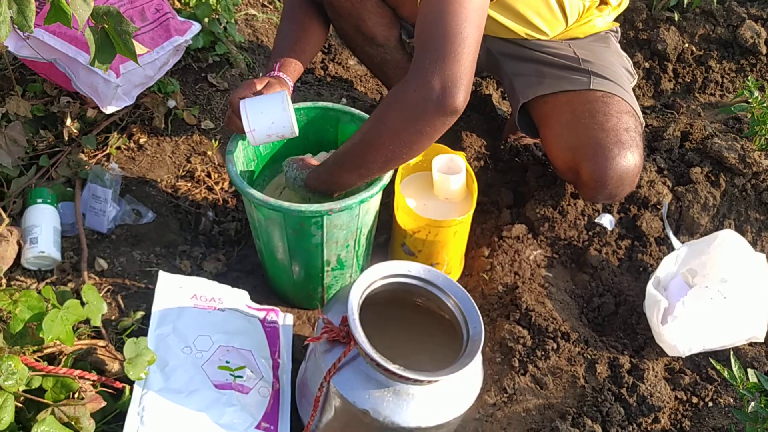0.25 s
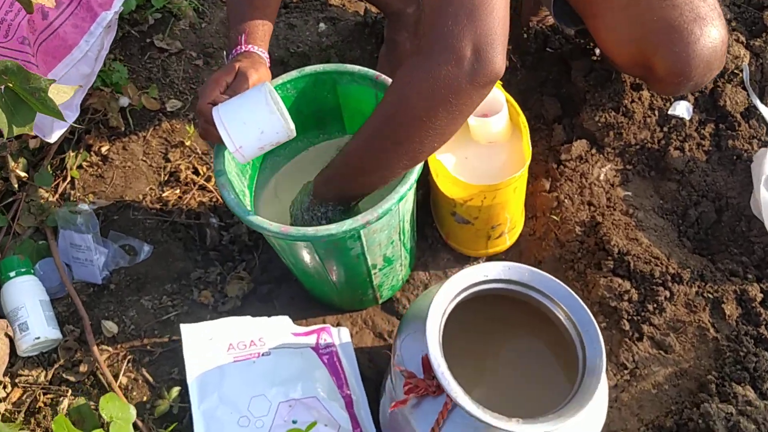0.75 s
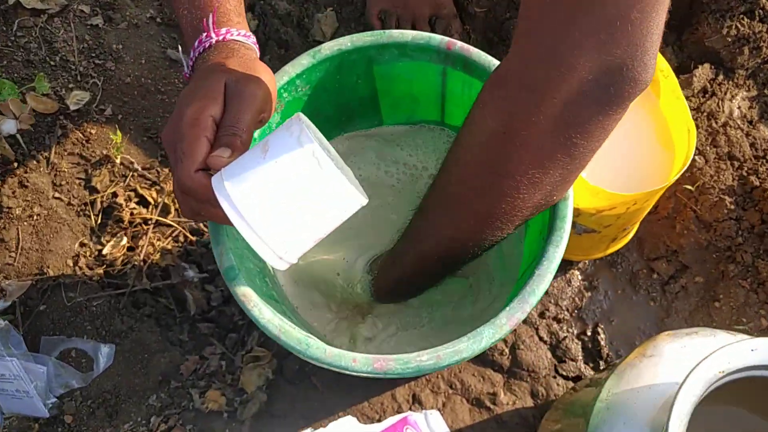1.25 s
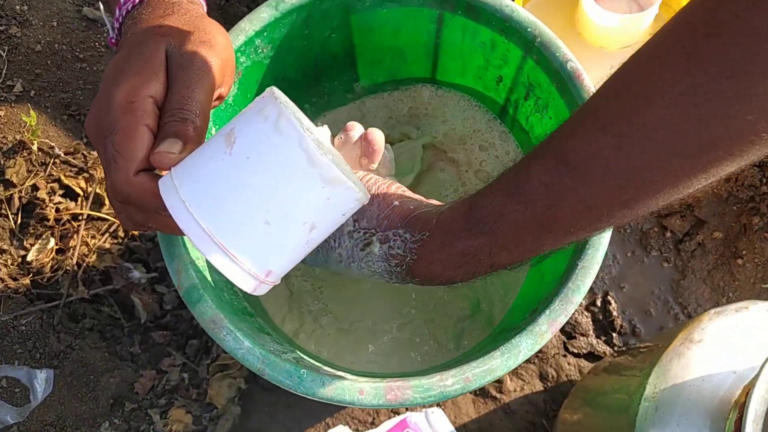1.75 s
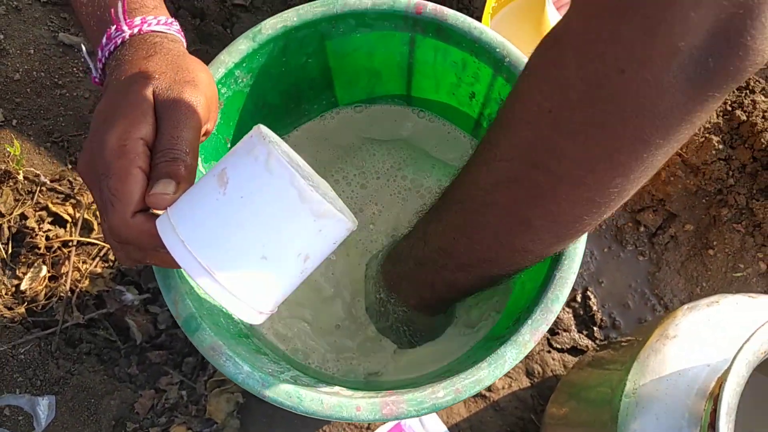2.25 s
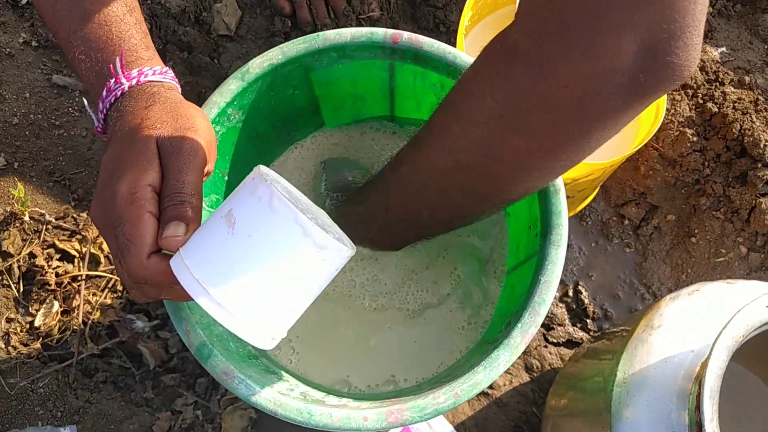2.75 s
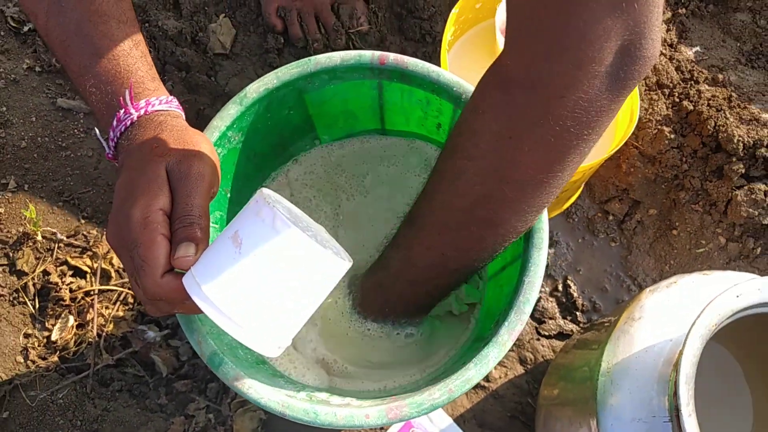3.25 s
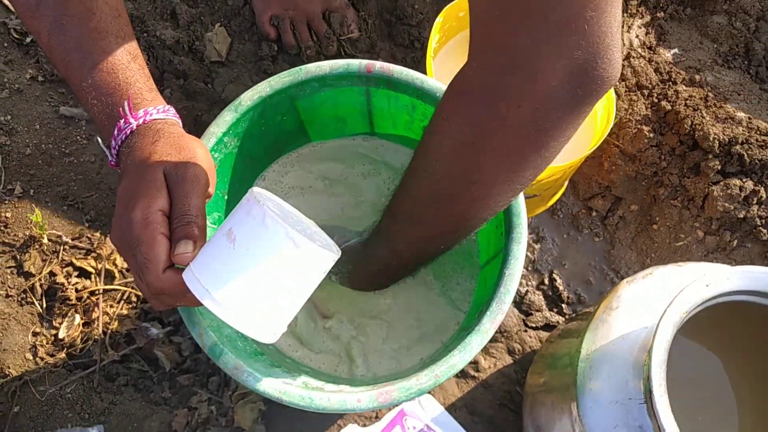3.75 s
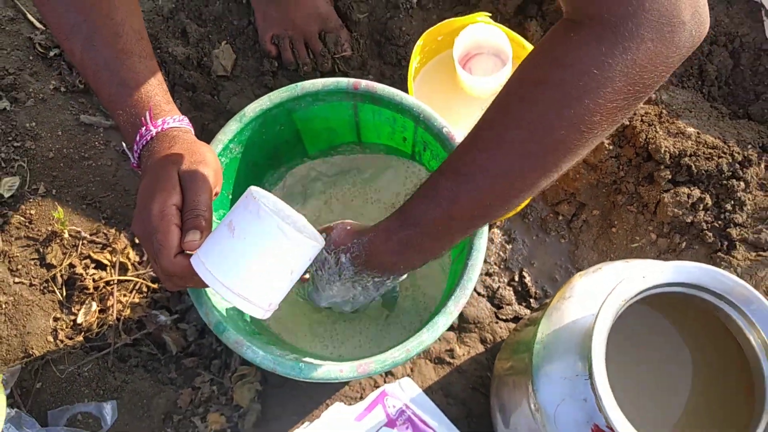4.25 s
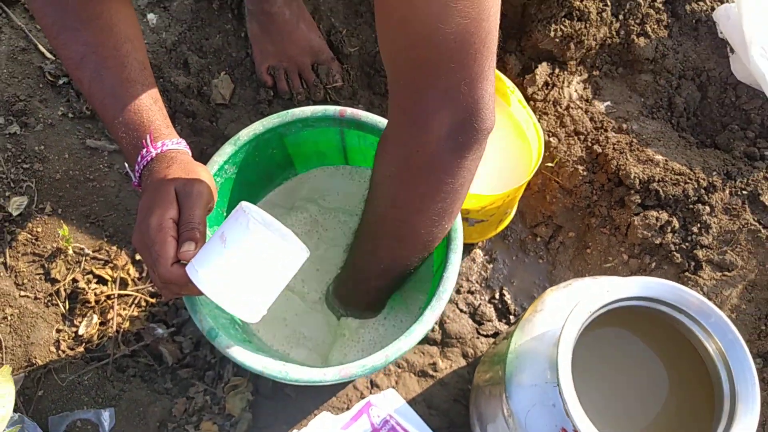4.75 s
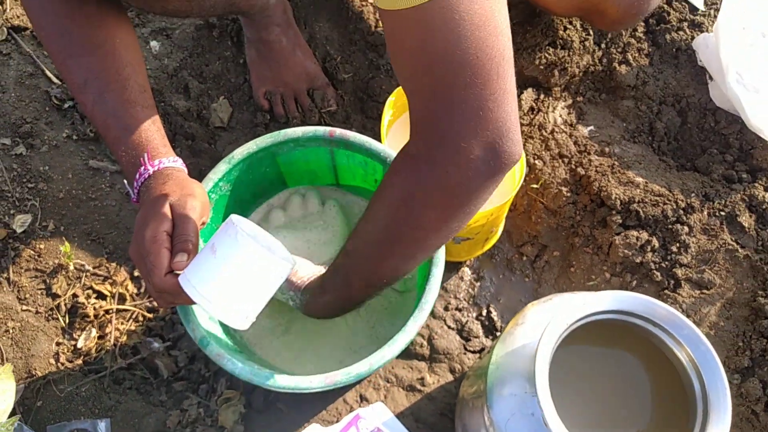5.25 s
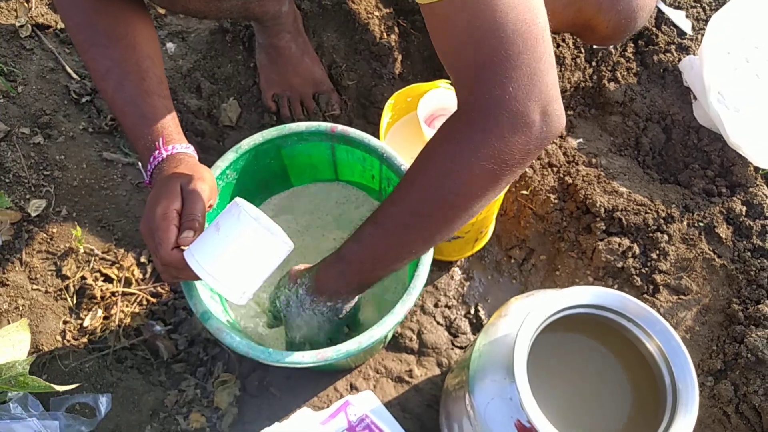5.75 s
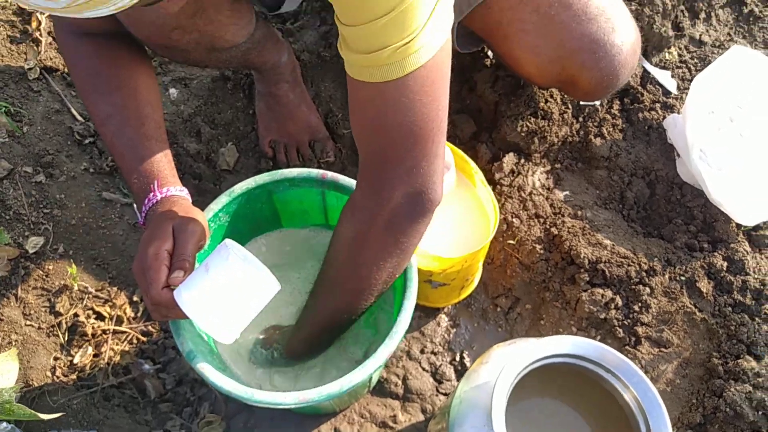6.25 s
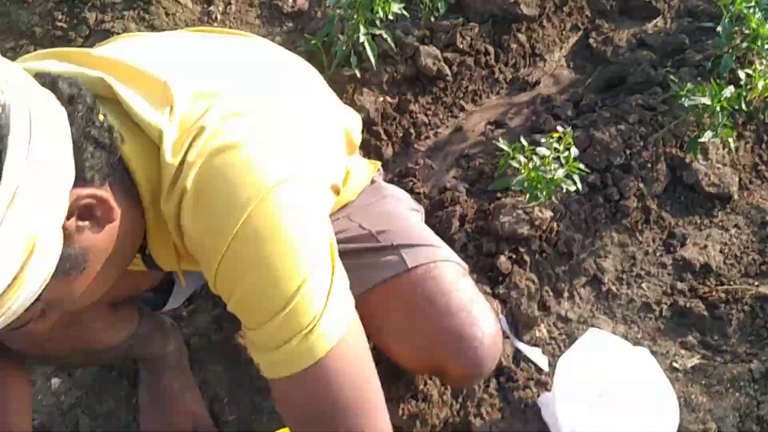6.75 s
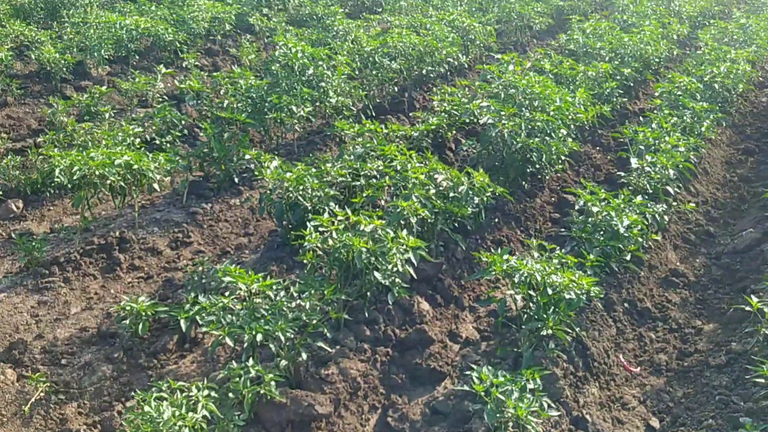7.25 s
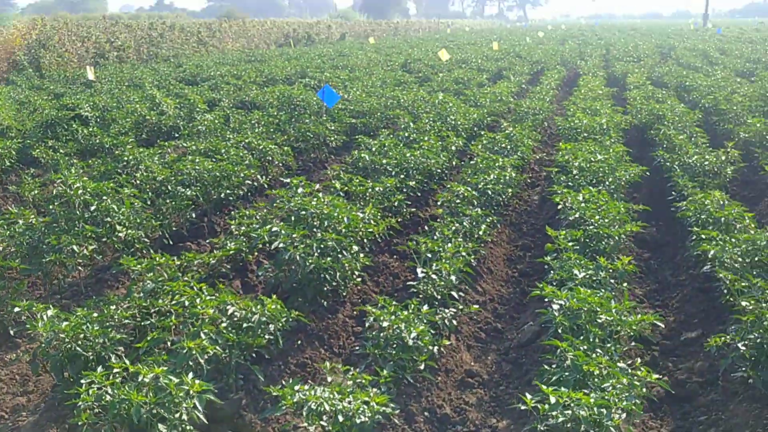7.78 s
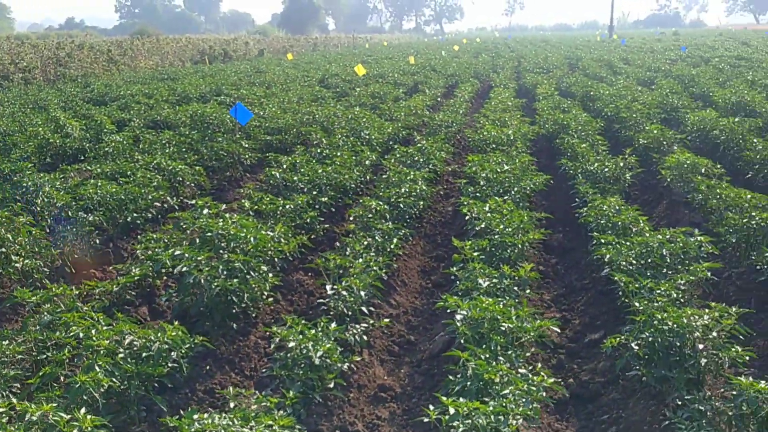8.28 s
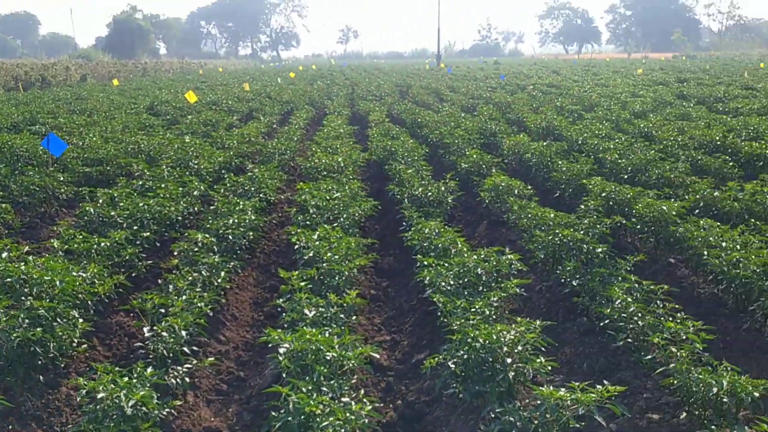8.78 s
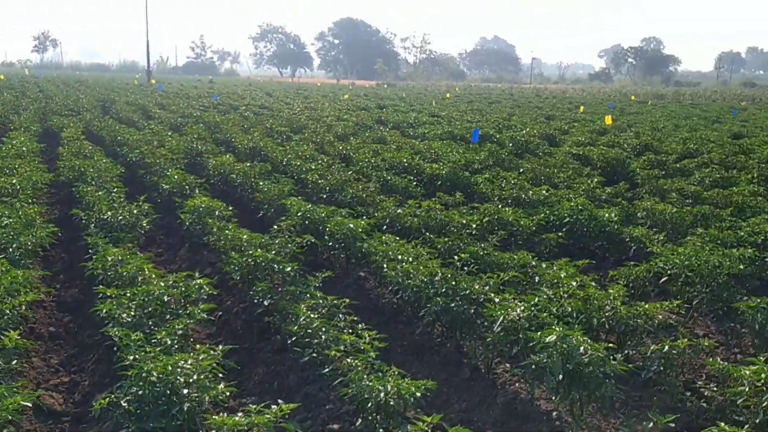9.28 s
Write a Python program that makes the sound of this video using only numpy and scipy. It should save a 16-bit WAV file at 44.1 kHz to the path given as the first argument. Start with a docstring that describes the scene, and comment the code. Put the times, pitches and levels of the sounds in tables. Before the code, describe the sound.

A quiet open field, heard in close, dry stereo with a faint steady hush. From 0 s a hand moves foamy water in a plastic bucket: a sharp tick far to the right and small slaps at 0.25 s, then lighter sloshes around 0.5 and 1 s. From 1.4 to 2.3 s the stirring is strongest, with hollow mid-pitched bubble gulps, patter and a bright splash near 1.9 s. Softer laps follow, then short sloshes at 3.1, 3.4, 3.75 and 4.0-4.3 s, with crisp ticks of drops and foam. It calms around 4.7-5.2 s, where a thin bird chirp rises far away. Strokes return at 5.4-5.6 s and 6.1-7 s, gurgling. Low wind bumps come at 6.8 and 7.2 s, another faint chirp at 7.3 s. A last small slosh at 8 s dies away, leaving hush and a faint falling whistle near 8.9 s.

```python
"""Stirring foamy water in a bucket

A hand stirs and scoops foamy water in a plastic bucket in a quiet field, close to the microphones.
Swarms of ringing bubbles make the wash of each stroke; big single bubbles gulp, small ones patter.
Coloured pulses tick as drops and foam burst, and a few bubbles whoop upward as they surface.
Filtered noise gives the hush of the field and light wind; sliding sines make a far bird's calls."""
import sys
import numpy as np
from scipy import signal
from scipy.fft import rfft, irfft, next_fast_len
from scipy.io import wavfile
from scipy.ndimage import uniform_filter1d

SR = 44100
rng = np.random.default_rng(int(sys.argv[2]) if len(sys.argv) > 2 else 0)


def generate_wav(sig):
    """Save sig (samples, or channels by samples) to the path in sys.argv[1] as 16-bit PCM at SR."""
    pcm = np.round(np.clip(np.atleast_2d(sig).T, -1, 1) * 32767).astype(np.int16)
    wavfile.write(sys.argv[1], SR, pcm)


N = 419831  # length [samples]


def amp(db):
    """Decibels to gain."""
    return 10 ** (np.asarray(db) / 20)


def unit(x):
    """Scales to rms 1."""
    return x / np.sqrt(np.mean(x ** 2) + 1e-20)


def smooth(x, first, second):
    """Two running means in a row, with widths in samples."""
    return uniform_filter1d(uniform_filter1d(x, first), second)


def read(points, hz):
    """Reads a curve of (frequency [Hz], value) points on a log-frequency axis."""
    f, value = np.transpose(points)
    return np.interp(np.log(hz + 1), np.log(f + 1), value)


def add(mix, s, sound):
    """Mixes a stereo sound in at time s."""
    part = mix[:, max(round(s * SR), 0):][:, :sound.shape[1]]
    part += sound[:, :part.shape[1]]


def colour(x, points, size=4096):
    """Minimum-phase filter with the given spectrum: it rings only after each click."""
    log_gain = np.log(amp(read(points, abs(np.fft.fftfreq(size, 1 / SR)))))
    taps = np.fft.ifft(np.exp(np.conj(signal.hilbert(log_gain)))).real
    return signal.oaconvolve(x, taps[None, :size // 2], axes=1)[:, :x.shape[1]]


def sides(pan_db):
    """Left and right gains of equal total power, from left minus right in dB."""
    return unit(amp([[pan_db / 2], [-pan_db / 2]]))


WOBBLE, WOBBLE_DB = .04, 2.2  # pitch (as a fraction) and level wobble for a shake of 1


def bubble(hz, decay_ms, rise, onset_cycles=1.0, shake=0):
    """A pocket of air rings, dies away and climbs in pitch towards the surface; moving water shakes it."""
    t = np.arange(int(SR * decay_ms * 6 / 1000)) / SR
    age = t * 1000 / decay_ms  # in decay times
    shake = np.resize(shake, len(t))
    pitch = hz * (1 + WOBBLE * shake) * 2 ** (rise * np.minimum(age, 3))  # rise: octaves per decay time
    turns = np.cumsum(pitch) / SR
    shape = np.exp(-age) * (1 - np.exp(-(turns / onset_cycles) ** 2))
    return np.sin(2 * np.pi * turns) * amp(WOBBLE_DB * shake[::-1]) * shape / shape.max()


def walls(x, wet_db, decay_ms, size=1800):
    """The bucket's walls scatter a short tail of echoes, different at each microphone."""
    ms = np.arange(size) * 1000 / SR
    echoes = rng.standard_normal((2, size)) * (rng.random((2, size)) < .12)
    taps = echoes * np.exp(-ms / decay_ms) * (ms > .5)
    taps /= np.linalg.norm(taps, axis=1, keepdims=True)
    return x + amp(wet_db) * signal.oaconvolve(x, taps, axes=1)[:, :x.shape[1]]


def noise(points, same):
    """Stereo noise of a given colour and left-right likeness, at rms 1."""
    size = next_fast_len(N, True)
    hz = np.fft.rfftfreq(size, 1 / SR)
    a, b = rfft(rng.standard_normal((2, size)))
    likeness = np.clip(read(same, hz), -1, 1)
    pair = np.array([a, likeness * a + np.sqrt(1 - likeness ** 2) * b])
    return unit(irfft(pair * amp(read(points, hz)), size)[:, :N])


# colour of the still field: (frequency [Hz], relative level [dB per Hz])
AIR_COLOUR = [(15, -3), (45, 0), (100, -9), (130, -12), (165, -7.5), (250, -14), (700, -17.5), (1500, -22),
              (4000, -24), (6500, -24), (8200, -20.5), (9400, -20), (10700, -28), (13000, -35),
              (16000, -40)]
# left-right likeness of air and wind: (frequency [Hz], correlation [-1 to 1])
AIR_LIKENESS = [(60, .35), (130, .35), (400, .15), (1400, 0)]
# wind at the microphones: (time [s], level [dB])
GUSTS = [(0, -61), (0.451, -63), (.6, -57.5), (.9, -56), (1.1, -48), (1.4, -62), (6.75, -62), (6.82, -41),
         (6.97, -47), (7.082, -57.5), (7.169, -55), (7.209, -44), (7.26, -63), (9.5, -63)]
# colour of the wind: (frequency [Hz], relative level [dB per Hz])
WIND_COLOUR = [(15, -3), (30, 0), (70, -3), (110, -10), (170, -20), (400, -45), (1500, -80)]
AIR_DB = -65


def field():
    """A steady hush of noise, with low gusts of wind on the microphones."""
    gust_db = np.interp(np.arange(N) / SR, *np.transpose(GUSTS))
    hush = amp(AIR_DB) * noise(AIR_COLOUR, AIR_LIKENESS)
    wind = amp(gust_db) * noise(WIND_COLOUR, AIR_LIKENESS) * sides(pan_db=11.5)
    return hush + wind


# gentle lapping, as the hand never quite rests: (time [s], level before layer shares and trims [dB])
LAPPING = [(0, -65), (.06, -76), (.15, -65), (.76, -71.5), (1.2, -61), (2.15, -60), (2.38, -64.5),
           (2.55, -60.5), (2.92, -67), (3.3, -57), (3.52, -69), (3.7, -59), (4.3, -61), (4.42, -84.5),
           (4.6, -62.5), (4.8, -72), (5.08, -72), (5.2, -64), (6.5, -60), (7.05, -62), (7.55, -81),
           (7.76, -70.5), (7.9, -84.5), (8.24, -68), (8.45, -83)]
# what lapping gives each layer: (churning [dB], patter [dB], spray [dB])
LAPPING_SHARES = (-1, 1, 2.5)


def lapping(t):
    """Power of the gentle lapping in the three water layers."""
    level_db = np.interp(t, *np.transpose(LAPPING), right=-90)
    return amp(level_db + np.array(LAPPING_SHARES)[:, None]) ** 2


# short slaps of water on the hand or the wall:
# (time [s], level before layer trims [dB], brightness: spray up and churning down [dB])
SLAPS = [(0.093, -50.5, 1.5), (0.254, -42, 3.5), (0.307, -48.5, -0.5), (.392, -50, 3.5), (0.434, -47, 5),
         (0.685, -52.5, -2.5), (0.956, -54.5, -4.5), (0.829, -46.5, 2), (.935, -54.5, 4), (1.111, -51, 1),
         (1.604, -44, 0.5), (1.846, -44.5, 5.5), (1.86, -38.5, 1.5), (2.029, -42.5, 5), (2.085, -50, 0),
         (2.122, -43.5, 6), (2.149, -44, 5), (2.302, -43.5, -0.5), (2.515, -53.5, 3.5),
         (2.809, -49.5, -1.5), (2.965, -53, 2), (3.088, -45.5, -1), (3.247, -49.5, 1.5), (3.331, -55, 4),
         (3.601, -50.5, 6), (3.75, -46.5, 7), (3.902, -48.5, 5.5), (4.325, -51.5, -3), (4.526, -50, -1.5),
         (4.565, -44.5, 5), (4.916, -57, 1), (5.043, -58.5, 2.5), (5.135, -58, 7.5), (5.614, -44.5, 6.5),
         (5.668, -49, 7), (5.832, -53.5, 1.5), (5.918, -50.5, 4.5), (5.967, -52, 0), (6.042, -54, 6),
         (6.105, -42.5, 0), (6.13, -52, 8.5), (6.908, -40.5, 6.5), (7.158, -48, 4.5), (7.185, -50.5, -0.5),
         (7.436, -59.5, -6), (8.092, -53, 3.5), (8.174, -57.5, 4), (8.234, -61.5, 2.5)]
SLAP_ATTACK_S, SLAP_FADE_S = 0.0036, 0.023  # time constants


def slaps(t):
    """Power of the slaps: each leaps up and fades exponentially in all three layers."""
    power = np.zeros((3, len(t)))
    for s, db, bright_db in SLAPS:
        shape = np.exp(-abs(t - s) / np.where(t < s, SLAP_ATTACK_S, SLAP_FADE_S))
        power += (amp(db + bright_db * np.array([[-1], [0], [1]])) * shape) ** 2
    return power


# sloshes, as the hand drives a wave round the bucket: (crest time [s], swell [s], run-off [s],
# then crest levels before layer trims: churning [dB], patter [dB], spray [dB])
SLOSHES = [(0.452, 0.17, .21, -59, -51, -48), (1.023, .06, .13, -54.5, -49.5, -42),
           (1.18, .3, .2, -60, -57, -54.5), (1.451, .2, .12, -47.5, -49.5, -44.5),
           (1.659, 0.13, 0.17, -52, -47.5, -41.5), (1.905, .025, .09, -53.5, -38.5, -34),
           (1.948, .04, .13, -54.5, -41, -38.5), (2.603, .1, .12, -54.5, -55, -57),
           (3.089, 0.064, .08, -54.5, -51, -51), (3.355, 0.0201, 0.1, -47.5, -47.5, -42.5),
           (3.758, .05, 0.0395, -49, -44.5, -60), (4.038, .06, .16, -49.5, -43.5, -43),
           (4.1, .04, .1, -52, -47, -46), (4.255, 0.06, 0.075, -50.5, -42, -40),
           (5.43, .2, .09, -49.5, -52.5, -50.5), (5.568, .07, 0.1137, -56.5, -46, -41.5),
           (6.277, 0.0054, .16, -50, -52.5, -50.5), (6.632, 0.073, .17, -49, -48, -45.5),
           (6.725, .08, .08, -53.5, -50, -51.5), (6.919, 0.097, 0.18, -53.5, -48.5, -45.5),
           (7.725, .05, .09, -57, -66, -80), (8.012, .05, .15, -53, -46.5, -51)]
# climb to the crest, sag over the run-off, and the steep slope beyond either end
SWELL_DB, RUN_OFF_DB, SETTLE_DB_PER_S = 13.5, 12, 437.5


def sloshes(t):
    """Power of the sloshes: a wave climbs to its crest, sags as it runs off, then settles."""
    power = np.zeros((3, len(t)))
    for crest, swell, run_off, *layers_db in SLOSHES:
        shape_db = np.interp(t - crest, [-swell, 0, run_off], [-SWELL_DB, 0, -RUN_OFF_DB])
        outside = np.maximum(0, np.maximum(crest - swell - t, t - crest - run_off))
        power += amp(np.array(layers_db)[:, None] + shape_db - SETTLE_DB_PER_S * outside) ** 2
    return power


def motion():
    """Levels in dB of churning, patter and spray: lapping, slaps and sloshes add their power."""
    t = np.arange(0, N / SR, .001)
    power = lapping(t) + slaps(t) + sloshes(t)
    return [np.interp(np.arange(N) / SR, t, 10 * np.log10(p)) for p in power]


def swarm(level_db, per_s, low_hz, high_hz, cycles, spread_db, pan_db, scatter_db, wet_db,
          crowding=.3, count=36, size=3000):
    """Bubbles of random size and place, driven by the hand: sparse in a lull, a dense wash in a splash."""
    level = amp(level_db)
    crowd = unit(level) ** crowding
    out = np.zeros((2, N))
    for hz in np.geomspace(low_hz, high_hz, count):
        life, rise, place = rng.random(3)
        ring = bubble(hz, 1000 * cycles * (.5 + life) / hz, .12 * rise)
        ring = np.pad(ring, (0, 900)) * sides(pan_db + scatter_db * (2 * place - 1))
        ring = walls(ring, wet_db, decay_ms=2.8)
        ring *= np.sqrt(hz / np.sum(ring ** 2))
        # candidate births are thinned so that more survive where the water is livelier
        born = rng.integers(0, N, size)
        expected = per_s * crowd[born] / count * N / SR
        chance = rng.random(size) * size / expected
        kept = chance < 1
        # most are faint, a few stand out
        strength = amp(spread_db * np.minimum(-np.log(chance[kept]), 4))
        at = (born[kept, None] + np.arange(ring.shape[1])).ravel()
        for mic, heard in zip(out, ring):
            mic += np.bincount(at, np.outer(strength, heard).ravel(), N)[:N]
    return out, level


def stirred(bubbles, level, points, size=1500):
    """Colours a swarm, evens out its slow swells and lets the stroke set its loudness."""
    x = unit(colour(bubbles, points))
    power = smooth(np.mean(x ** 2, 0), size, size)
    return level * x / np.sqrt(abs(power) + 0.0068)  # the floor keeps sparse moments from being blown up


# colours of the three water layers: (frequency [Hz], relative level [dB per Hz])
CHURN_COLOUR = [(150, -12.5), (240, -12), (310, -5.5), (400, 3), (540, -7.5), (680, -19), (870, 8),
                (1020, 2), (1250, 2), (1700, 4), (2400, -32.5)]
PATTER_COLOUR = [(1100, -20.5), (1900, -0.5), (2500, -1.5), (3500, -2), (5200, -3), (6200, -14),
                 (8000, -44)]
SPRAY_COLOUR = [(3500, -76), (6000, -14), (7200, -7), (8300, -2), (9100, 0), (10200, -7.5), (12500, -23.5),
                (15000, -13), (16500, -37)]


def water(churn_db, patter_db, spray_db, clump_db=2.5):
    """Churning, patter and spray: three sizes of bubble, all clumping together as wavelets break."""
    clumps = amp(clump_db * unit(smooth(rng.standard_normal(N), 420, 300)))
    churn, churn_level = swarm(
        churn_db, per_s=1100, low_hz=245.2, high_hz=1983, cycles=8.7,
        spread_db=4.0, pan_db=2.5, scatter_db=-2.5, wet_db=-8.0)
    patter, patter_level = swarm(
        patter_db, per_s=1500, low_hz=1596, high_hz=6624, cycles=11.95,
        spread_db=4.5, pan_db=-1.0, scatter_db=16.0, wet_db=1.5)
    spray, spray_level = swarm(
        spray_db, per_s=2900, low_hz=5430, high_hz=13580, cycles=5.1,
        spread_db=5.0, pan_db=14.5, scatter_db=33, wet_db=14.5)
    return (stirred(churn * clumps, churn_level, CHURN_COLOUR) * amp(-4.0)
            + stirred(patter * clumps, patter_level, PATTER_COLOUR) * amp(-2.5)
            + stirred(spray * clumps, spray_level, SPRAY_COLOUR) * amp(0.3))


def crackle(level_db, per_s, spread_db, scatter_db, crowding=0.38, count=7):
    """Tiny clicks from several places, thicker where the level is higher; rms 1."""
    crowd = unit(amp(level_db)) ** crowding
    out = np.zeros((2, N))
    for place in np.linspace(-1, 1, count):
        born = np.flatnonzero(rng.random(N) < per_s * crowd / count / SR)
        size, sign = rng.random((N // 100, 2))[:len(born)].T
        clicks = np.zeros(N)
        clicks[born] = np.sign(sign - .5) * amp(spread_db * np.minimum(-np.log(size), 3))
        placed = np.roll(clicks, int(6 * place)) * sides(scatter_db * place)
        out += walls(placed, wet_db=3.5, decay_ms=2.1)
    return unit(out)


# colour of the bursting foam: (frequency [Hz], relative level [dB per Hz])
FOAM_COLOUR = [(400, -21), (1200, -16), (2800, 1.5), (4200, 0.5), (6000, 3.5), (7500, -3), (9000, -4.5),
               (10500, -1.5), (13000, -1.5), (16000, -28)]
FOAM_DB, FOAM_PER_S = -9, 220  # level against the spray curve; click rate at a crowd of 1


def foam(spray_db):
    """Foam bursts in tiny clicks wherever the spray flies."""
    clicks = crackle(spray_db, FOAM_PER_S, spread_db=6.5, scatter_db=1)
    clicks = unit(colour(clicks, FOAM_COLOUR))
    return amp(spray_db + FOAM_DB) * clicks * sides(pan_db=3.0)


def strays(level_db, per_s, crowding=.25, count=400):
    """Random moments, likelier where the water is livelier: rows (s, level there dB, two chances 0-1)."""
    when, a, b = rng.random((count, 3))[:int(per_s * N / SR)].T
    odds = np.cumsum(amp(crowding * level_db))
    at = np.searchsorted(odds, when * odds[-1])
    return zip(at / SR, level_db[at], a, b)


# pitches that the bucket favours: (centre pitch [Hz], level against the churning curve [dB])
GURGLE_PITCHES = [(394, -1), (488, -3.5), (855, 3.5), (1158, 5.5), (1378, 9.5), (711, -3.5)]
GURGLES_PER_S, GURGLE_MS, GURGLE_OCTAVES = 24, 5.2, 0.18  # rate, typical decay, detuning either way


def gurgles(churn_db):
    """Lesser bubbles at random around the bucket's favoured pitches, as rows for gulps()."""
    rows = []
    for s, db, choice, detune in strays(churn_db, GURGLES_PER_S):
        hz, above_db = GURGLE_PITCHES[int(choice * len(GURGLE_PITCHES))]
        pitch = hz * 2 ** (GURGLE_OCTAVES * (2 * detune - 1))
        decay_ms = GURGLE_MS * 2 ** rng.uniform(-0.92, 1)
        rows.append((s, pitch, db + above_db, decay_ms))
    return rows


DRIP_HZ = (1500, 5200)  # pitch range
DRIPS_PER_S, DRIP_DB, DRIP_MS = 17, 5, 3.6  # rate, top level against the patter curve, middling decay


def drips(patter_db):
    """Drops fall back into a splash and pull under small bubbles, shorter when smaller: rows for gulps()."""
    low_hz, high_hz = DRIP_HZ
    rows = []
    for s, db, small, faint in strays(patter_db, DRIPS_PER_S, crowding=.8):
        pitch = low_hz * (high_hz / low_hz) ** small
        rows.append((s, pitch, db + DRIP_DB - 5 * faint, DRIP_MS * (1.5 - small)))
    return rows


# the loudest ticks of drops, foam and plastic:
# (time [s], level over the first 2.5 ms before the trim [dB], left minus right [dB])
TICKS = [(.0918, -39.5, 0), (.2527, -30.5, -23), (.2544, -33, -27), (.2562, -28, -22), (.258, -33, -14),
         (.2661, -16, -37.5), (.3097, -31.5, -14), (.3902, -29, 14), (.4365, -27, 23), (.6431, -40.5, 2),
         (1.0856, -35, 19), (1.3828, -39, 13), (1.4642, -31, 28), (1.5063, -40, 4.5), (1.5442, -34, 7),
         (1.572, -31, 3), (1.6125, -36.5, 4), (1.6628, -24.5, 1), (1.6922, -41, -1), (1.717, -33, 13),
         (1.7369, -25, 24), (1.7481, -32, 3), (1.7928, -27.5, 7), (1.8455, -31.5, 9), (1.8625, -24, 1),
         (1.8813, -19, 18), (1.979, -41, 6), (2.031, -32, 5), (2.11, -32, 0), (2.121, -26, 9),
         (2.163, -33, 4), (2.2376, -39.5, 11), (2.2546, -36, -2), (2.4314, -40.5, 0), (2.4915, -39, 12),
         (2.607, -30, 18), (2.7662, -40, 0), (3.092, -29.5, 0), (3.2259, -38, 4), (3.2583, -38, 7),
         (3.3444, -22, 4), (3.3499, -26, -12.5), (3.3549, -24.5, 1), (3.3669, -22, 21),
         (3.3902, -31.5, -0.5), (3.598, -34.5, 6), (3.6155, -29, 27), (3.6229, -33.5, 6), (3.666, -35.5, 2),
         (3.7366, -32, 9), (3.7672, -36, 4), (3.8761, -38.5, 2), (3.9115, -31.5, 35), (3.9677, -34, -4),
         (4.053, -28, 10), (4.113, -30, 10), (4.1471, -31, 25), (4.1819, -33.5, 9), (4.2045, -47, 17),
         (4.2249, -21, 10), (4.3087, -28, 8), (4.5195, -30, 9), (4.5503, -32, 1), (4.571, -25, 9),
         (4.7137, -42.5, 3), (4.9214, -39.5, 5), (5.0481, -38.5, 5), (5.101, -43, 1), (5.12, -40.5, 4),
         (5.1374, -37, 29), (5.222, -34, 36), (5.4081, -32.5, 7), (5.4743, -34, 13), (5.483, -34.5, 38),
         (5.5255, -31, 9), (5.5386, -44, 2), (5.5455, -24.5, 9), (5.577, -36, 8), (5.619, -20.5, 11),
         (5.888, -39, 18), (5.9156, -35.5, 14), (5.976, -49, 8), (6.0242, -40, 5), (6.0456, -33, 19),
         (6.1365, -26.5, 7), (6.292, -27.5, 8), (6.3874, -36, 4), (6.458, -37, 11), (6.6139, -31.5, 11),
         (6.6516, -33, 11), (6.751, -42, -6), (6.9122, -33, 2), (7.0743, -43, -6), (7.1615, -40.5, -2),
         (7.1879, -33.5, -3), (7.999, -39.5, 0), (8.039, -41.5, 3)]
# colours of a tick's bright snap and of its dull knock: (frequency [Hz], relative level [dB per Hz])
SNAP_COLOUR = [(150, -36), (1500, -84), (4500, -20), (6200, -15.5), (7400, 1.5), (8400, 8), (9100, 14),
               (10200, 2.5), (12500, -7.5), (16000, -19)]
KNOCK_COLOUR = [(150, 1), (900, 11), (2400, 9.5), (4500, 16.5), (6000, 22), (9000, -46), (16000, -72)]
KNOCK_DB, KNOCK_PER_PAN_DB = -8.5, -0.8445  # knock against snap; ticks on the left are thinner


def ticks(rows, size=1500, count=110, fizz_db=-16, fizz_ms=1.0):
    """A film tears with a fizz, a sharp pulse and a tiny bubble's ring; one-sided ticks carry less echo."""
    out = np.zeros((2, N))
    ms = (np.arange(size) - count) * 1000 / SR  # the pulse sits at sample `count`
    for s, db, pan_db in rows:
        knock_db = KNOCK_DB + KNOCK_PER_PAN_DB * max(pan_db, 0)
        ring = bubble(rng.uniform(7000, 13000), decay_ms=.3, rise=0)
        ring = np.pad(ring, (count, size))[:size]
        fizz = rng.standard_normal(size) * np.exp(-abs(ms) / fizz_ms)
        pulse = signal.unit_impulse(size, count)
        pulse = pulse + amp(-17.0 - .5 * abs(pan_db)) * ring
        pulse = pulse + amp(fizz_db - 0.56 * abs(pan_db)) * fizz
        pulse = walls(pulse * sides(pan_db), wet_db=4 - .8 * abs(pan_db), decay_ms=1.6)
        snap, knock = colour(pulse, SNAP_COLOUR), colour(pulse, KNOCK_COLOUR)
        tick = unit(snap) + amp(knock_db) * unit(knock)
        first_instant = tick[:, count:2 * count]
        add(out, s - count / SR, amp(db) * tick / np.sqrt(np.mean(first_instant ** 2)))
    return amp(-1.5) * out


# the loudest single bubbles:
# (time [s], starting pitch [Hz], peak before wobble, echo and trim [dB], decay [ms])
BUBBLES = [(.267, 335, -37.5, 1.9), (.286, 3020, -37, 3), (.289, 1066, -32.5, 9.9), (.311, 298, -34, 0.2),
           (.323, 1240, -43, 5), (.375, 2500, -44.5, 4.9), (.392, 2770, -42.5, 3.9), (.436, 3580, -42, 1.9),
           (.477, 840, -42.5, 4.3), (.685, 910, -47.5, 5), (.974, 1810, -38.5, 3.2),
           (1.111, 883, -40, 11.7), (1.297, 380, -48.5, 5.4), (1.385, 360, -45.5, 8),
           (1.405, 410, -46, 5.3), (1.417, 580, -44.5, 7.5), (1.434, 380, -45, 6.7), (1.46, 863, -40, 15.4),
           (1.502, 2140, -36.5, 2), (1.528, 1790, -40, 5.2), (1.59, 1230, -37, 5.4), (1.604, 1120, -32, 13),
           (1.638, 3790, -33, 2.3), (1.643, 1145, -26, 10.8), (1.664, 1383, -27.5, 7.7),
           (1.7172, 5440, -28.5, 1.5), (1.747, 2000, -31.5, 1.7), (1.724, 1100, -43, 23),
           (1.773, 1250, -38.5, 5), (1.774, 1920, -33.5, 3.5), (1.845, 1500, -40, 4), (1.852, 3670, -28, 2),
           (1.857, 1350, -35, 2.2), (1.86, 2320, -34, 2.5), (1.9, 1095, -34.5, 4.6), (1.94, 3050, -41, 8.5),
           (2.085, 1920, -38, 2.8), (2.103, 2460, -35, 4.2), (2.161, 440, -46.5, 7.8),
           (2.309, 1370, -42, 8), (2.448, 2430, -34.5, 1.6), (2.514, 500, -44.5, 8.5),
           (2.554, 1450, -49, 9.4), (2.556, 3320, -39, 4.6), (2.604, 1700, -42, 5.7),
           (2.636, 990, -38.5, 5.4), (2.669, 339, -45.5, 18.4), (2.712, 400, -39.5, 4.5),
           (2.81, 403, -49, 9.3), (2.836, 363, -50.5, 13), (3.039, 355, -41.5, 2.9),
           (3.073, 376, -39.5, 5.8), (3.079, 3900, -30, 2.5), (3.093, 830, -40.5, 3.5),
           (3.249, 2460, -32, 1.9), (3.344, 1117, -39, 5.2), (3.369, 483, -42, 4.8), (3.375, 876, -41, 6.6),
           (3.698, 430, -48.5, 4.4), (3.726, 413, -43, 8.8), (3.737, 1220, -36, 3),
           (3.741, 492, -28.5, 4.2), (3.757, 2760, -31.5, 2.4), (3.777, 820, -46, 7.6),
           (3.812, 420, -49, 14), (3.899, 409, -44.5, 9.6), (4.017, 1020, -38, 5.5),
           (4.032, 2370, -39.5, 7.8), (4.055, 388, -41, 4.7), (4.057, 1640, -40, 4.4),
           (4.111, 973, -42.5, 8.6), (4.132, 1090, -44.5, 5.8), (4.155, 1180, -44, 6.7),
           (4.225, 4300, -48, 1.6), (4.23, 390, -41.5, 7.4), (4.258, 1940, -28.5, 2.1),
           (4.292, 1086, -48, 12), (4.326, 1250, -45.5, 4.3), (4.521, 438, -46, 5.4),
           (4.549, 411, -48.5, 23), (4.569, 1340, -32, 0.96), (4.603, 1340, -47, 4.7),
           (4.655, 2510, -52, 5.3), (4.825, 400, -56, 6.2), (5.03, 4100, -36.5, 0.78), (5.257, 480, -50, 5),
           (5.265, 920, -53, 3.7), (5.302, 1400, -46, 6.7), (5.4, 1330, -46, 3.7), (5.425, 975, -38, 4.3),
           (5.446, 1780, -37.5, 4.5), (5.54, 1130, -41, 3.4), (5.561, 1660, -34.5, 2.8),
           (5.618, 412, -46, 12.6), (5.661, 3560, -40.5, 2.5), (5.84, 890, -44.5, 3.3),
           (5.915, 3580, -34.5, 2.7), (6.105, 1293, -34.5, 2), (6.111, 825, -36.5, 6.5),
           (6.121, 414, -39.5, 3.7), (6.28, 1320, -44, 4), (6.297, 405, -39.5, 3.8), (6.314, 380, -48, 6.1),
           (6.314, 2600, -39.5, 5.2), (6.342, 1295, -48, 6.4), (6.382, 486, -44, 7), (6.398, 396, -44, 6.4),
           (6.429, 870, -43.5, 6), (6.452, 435, -53, 8), (6.492, 444, -52, 8.6), (6.544, 1360, -38, 3.2),
           (6.573, 460, -44, 3), (6.577, 883, -45.5, 5.5), (6.596, 1315, -37.5, 5.1),
           (6.608, 1490, -45, 4.2), (6.633, 2460, -47, 4.7), (6.644, 1470, -39, 3.3), (6.66, 1530, -47, 6),
           (6.719, 1410, -36.5, 3), (6.735, 890, -52, 8.8), (6.757, 880, -36, 10.5),
           (6.779, 1114, -35.5, 5.7), (6.864, 870, -45, 5), (7.02, 1065, -49, 12), (7.048, 855, -39.5, 6.3),
           (7.055, 640, -46, 4.9), (7.155, 1640, -37.5, 6.8), (7.161, 4700, -35.5, 3),
           (7.192, 614, -45.5, 8.7), (7.334, 923, -46, 6), (7.449, 1940, -46, 6), (7.717, 368, -41.5, 7),
           (7.966, 1628, -39.5, 3), (8.018, 376, -45, 4.1)]
# where the bubbles are heard: (pitch [Hz], left minus right [dB])
GULP_PAN = [(400, 3.5), (850, 1.5), (1200, 4.5), (2400, -7.5)]
RISE_OCTAVES, RISE_AT_HZ = 0.0356, 1060  # base climb per decay time at this pitch, varied per bubble
SWIRL_DB, SWIRL_MS = -12.5, 8.7  # water that closes over a bubble: level against the ring, decay


def gulps(rows, splat_db=-15, splat_ms=1.5, size=2400):
    """Bubbles pulled under: each closes with a wet splat and rings unsteadily in a swirl of water."""
    out = np.zeros((2, N))
    ms = np.arange(size) * 1000 / SR
    for s, hz, db, decay_ms in rows:
        shake, splat, swirl = rng.standard_normal((3, size))
        # smaller bubbles climb faster
        rise = RISE_OCTAVES * np.sqrt(hz / RISE_AT_HZ) * rng.uniform(.3, 2.4)
        ring = bubble(hz, decay_ms, rise, shake=unit(uniform_filter1d(shake, size=130)))
        splat = unit(colour(splat[None], KNOCK_COLOUR)) * np.exp(-ms / splat_ms)
        band = signal.butter(2, [.8 * hz, 1.35 * hz], "band", fs=SR)
        swirl = unit(signal.lfilter(*band, swirl)) * np.exp(-ms / SWIRL_MS)
        gain = amp(db) * sides(read(GULP_PAN, hz))
        add(out, s, gain * ring)
        add(out, s, gain * (amp(splat_db) * splat + amp(SWIRL_DB) * swirl))
    return amp(-1) * walls(out, wet_db=-9, decay_ms=12)


# bubbles that race to the surface:
# (start [s], length [s], first pitch [Hz], last pitch [Hz], level before fade and echo [dB])
WHOOPS = [(2.309, .024, 2100, 2700, -36), (2.646, 0.03, 830, 980, -39), (2.872, .04, 720, 1200, -46),
          (4.327, .034, 2110, 3000, -60), (5.428, 0.025, 1160, 1700, -42.5),
          (6.997, 0.019, 1280, 1700, -41.5), (7.456, 0.029, 1033, 2400, -47)]
WHOOP_BEND, WHOOP_FADE_DB = 1.35, 11  # sweep curve (above 1 speeds up), fade over the length
WHOOP_ATTACK_S = .003  # ramp at both ends


def whoops():
    """Bubbles that ring on while they surface, so their pitch sweeps up ever faster as they fade."""
    out = np.zeros((2, N))
    for s, length, first_hz, last_hz, db in WHOOPS:
        t = np.arange(int(length * SR)) / SR
        u = t / length
        hz = first_hz * (last_hz / first_hz) ** (u ** WHOOP_BEND)
        ramps = np.minimum(np.minimum(t, length - t) / WHOOP_ATTACK_S, 1)
        shape = ramps * amp(db - WHOOP_FADE_DB * u)
        whoop = shape * np.sin(2 * np.pi * np.cumsum(hz) / SR)
        add(out, s, whoop * sides(read(GULP_PAN, first_hz)))
    return walls(out, wet_db=-7, decay_ms=12)


# bird calls: (start [s], length [s], first pitch [Hz], middle pitch [Hz], last pitch [Hz],
# peak before flutter and panning [dB])
CHIRPS = [(5.14, 0.13, 4060, 4650, 5400, -60), (7.3, 0.11, 4300, 4800, 6200, -61),
          (8.725, 0.032, 2650, 2740, 2720, -71), (8.938, 0.11, 2330, 2100, 2040, -67)]


def birds(waver=0.019, flutter_db=5):
    """Thin far whistles: sines that slide in pitch, waver and flutter in the open air."""
    out = np.zeros((2, N))
    for s, length, first_hz, middle_hz, last_hz, db in CHIRPS:
        u = np.linspace(0, 1, int(length * SR))
        wander = unit(uniform_filter1d(rng.standard_normal((2, SR)), size=200))
        drift, flutter = wander[:, :len(u)]
        slide = np.polyfit([0, .5, 1], [first_hz, middle_hz, last_hz], 2)
        hz = np.polyval(slide, u) * (1 + waver * drift)
        shape = unit(amp(flutter_db * flutter)) * signal.windows.tukey(len(u), .5)
        whistle = np.sin(2 * np.pi * np.cumsum(hz) / SR) * shape
        add(out, s, amp(db) * whistle * sides(pan_db=-21.0))
    return out


def scene():
    """The bucket in the open field."""
    churn_db, patter_db, spray_db = motion()
    wash = water(churn_db, patter_db, spray_db) + foam(spray_db)
    wash = walls(wash, wet_db=-8.5, decay_ms=10.2) * amp(-0.58)
    singles = gulps(list(BUBBLES) + gurgles(churn_db) + drips(patter_db))
    return field() + wash + ticks(TICKS) + singles + whoops() + birds()


# colour difference of the two microphones: (frequency [Hz], left minus right [dB])
MIC_TILT = [(500, -5.5), (1400, -3.5), (2200, -3.5), (3000, -1), (4200, 3.5), (6500, -5.5), (9000, -2.5),
            (11500, 2.5), (13000, 7), (15000, -9)]
# the left microphone hears the sound later: (frequency [Hz], lag [radians])
MIC_LAG = [(0, 0), (1030, .6), (1500, 1.2), (2600, 5.6), (5000, 9), (10900, 17.8), (16000, 25)]
EDGE_HZ = 16300  # top of the band


def record(dry):
    """Colour and spacing of the two microphones, then the band limit."""
    size = next_fast_len(N, True)
    hz = np.fft.rfftfreq(size, 1 / SR)
    tilt_db = read(MIC_TILT, hz)
    lag = np.interp(hz, *np.transpose(MIC_LAG))
    mics = np.array([amp(tilt_db / 2) * np.exp(-1j * lag), amp(-tilt_db / 2)])
    heard = irfft(rfft(dry, size) * mics, size)[:, :N]
    low_pass = signal.firwin(511, EDGE_HZ, window=("kaiser", 9), fs=SR)
    return signal.oaconvolve(heard, low_pass[None], "same")


dry = scene()
out = record(dry)
generate_wav(out)
```